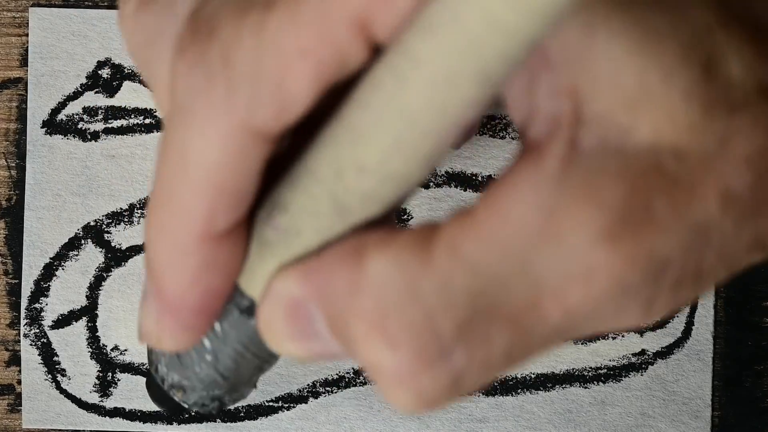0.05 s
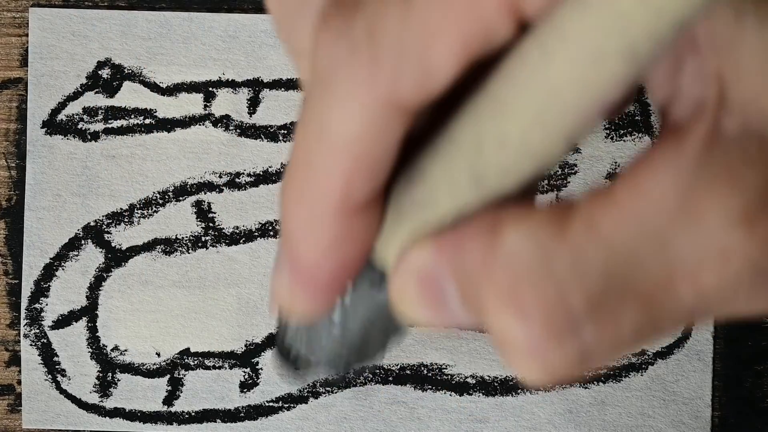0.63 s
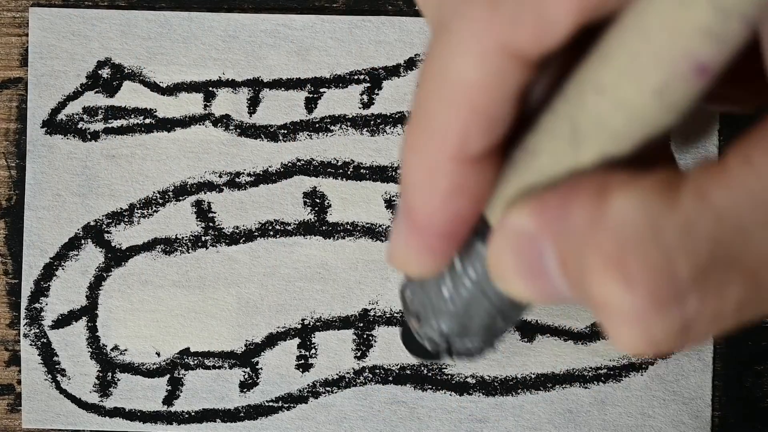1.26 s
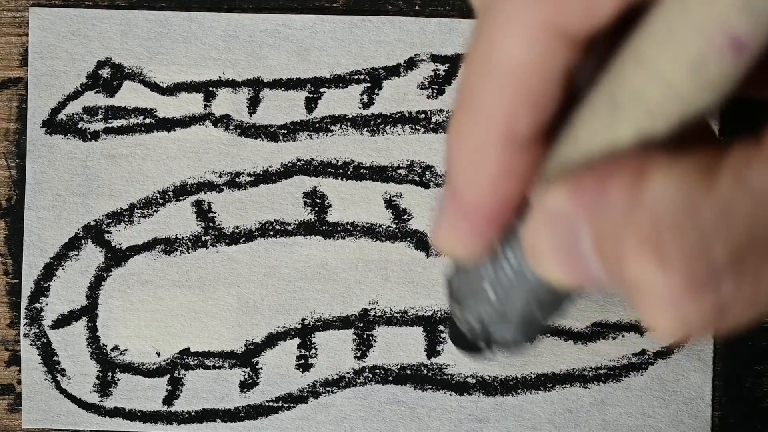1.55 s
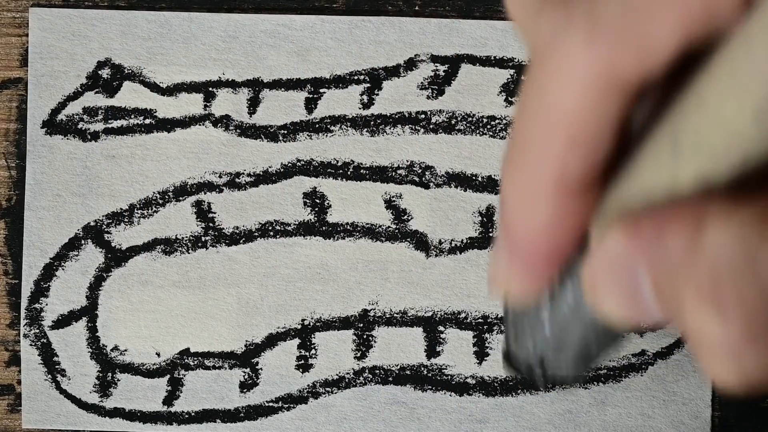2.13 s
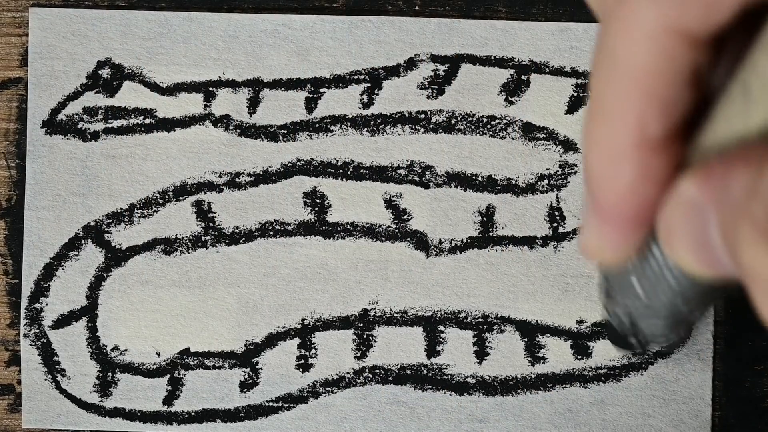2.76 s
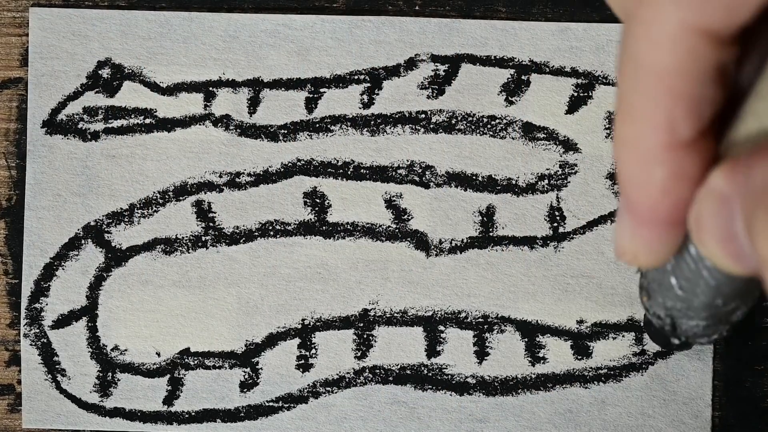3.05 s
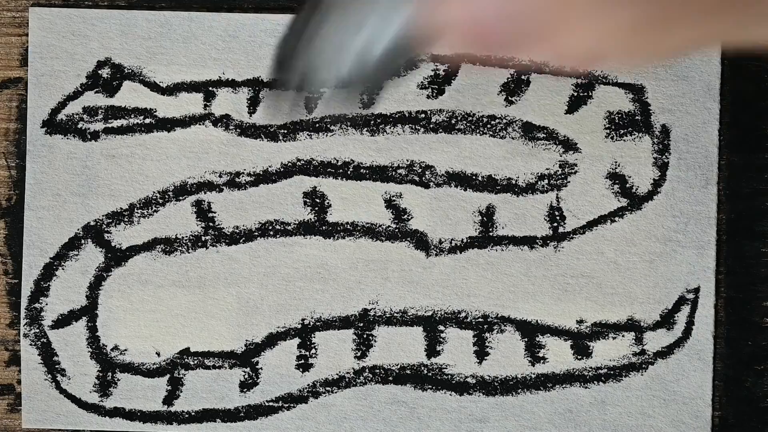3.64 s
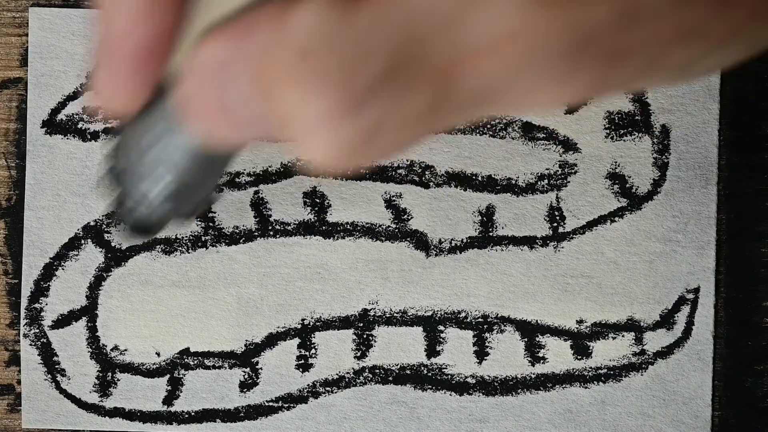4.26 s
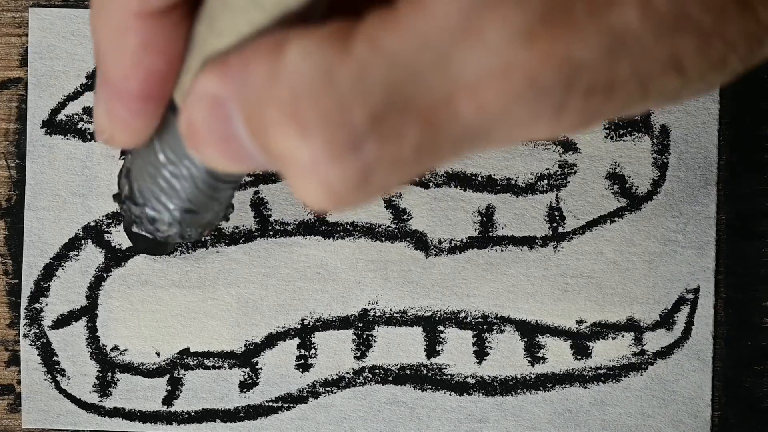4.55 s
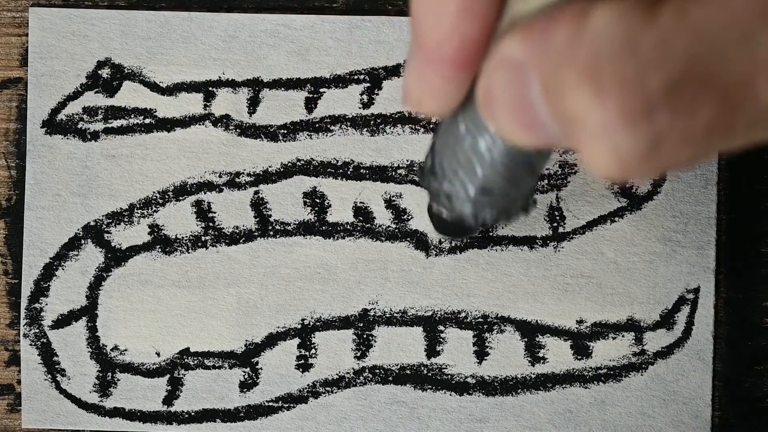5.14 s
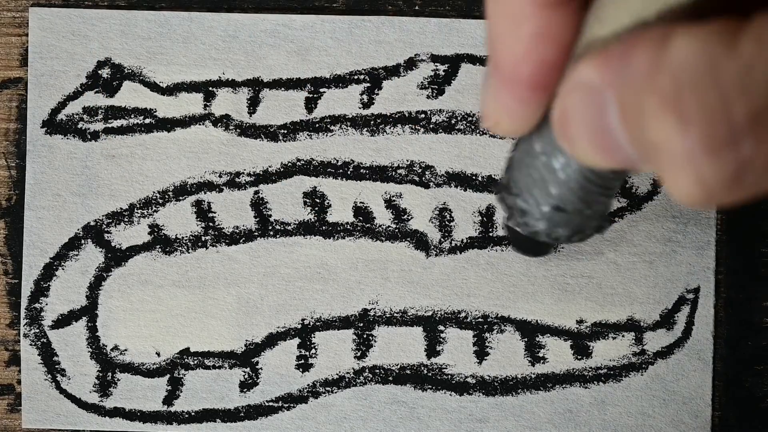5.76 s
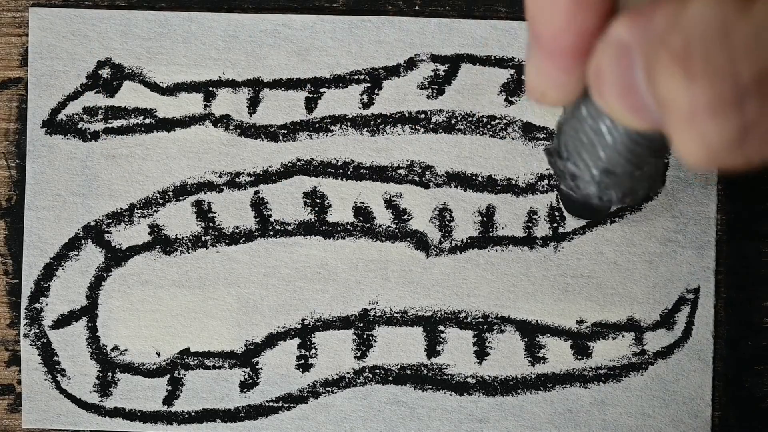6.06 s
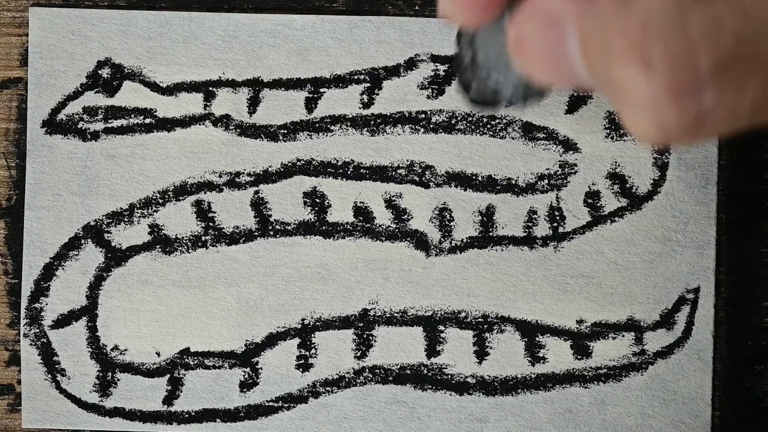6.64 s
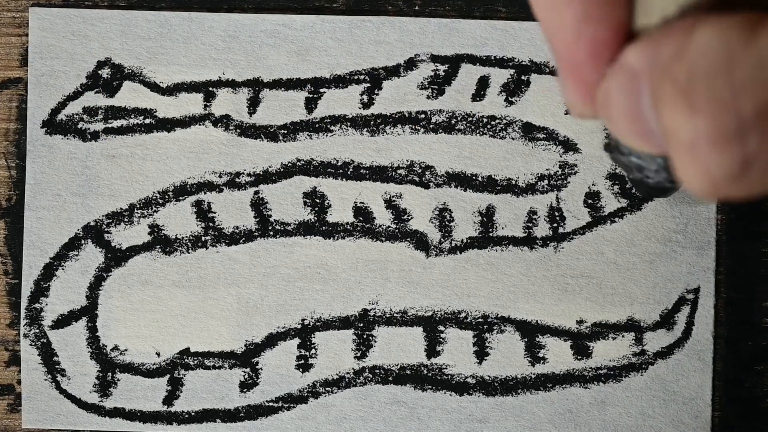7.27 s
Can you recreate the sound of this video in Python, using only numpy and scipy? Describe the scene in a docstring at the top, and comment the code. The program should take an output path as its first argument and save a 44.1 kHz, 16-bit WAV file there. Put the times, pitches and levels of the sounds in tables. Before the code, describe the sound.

A crayon scribbles short marks on paper on a wooden table, close to the microphone. The tip lands with a dull thud, scrubs quickly to and fro with a dry hiss and rasp, then lifts as the sheet and its backing drop back with a clack. This repeats two or three times a second, pauses briefly midway, then continues more slowly. Light brushing falls between some marks, over a steady hiss in a quiet room.

```python
"""A taped black crayon scribbles short marks on paper on a wooden table, close to the microphones.
First the tip lands with a thud. It then scrubs to and fro: wax slipping on the paper's tooth hisses,
the backing under the sheet rasps and the table rumbles. Last it lets go, and sheet and backing drop
back with a clack. Light brushing falls between some marks.
A quiet room and a steady hiss lie under it throughout."""
import sys
import numpy as np
from scipy import signal
from scipy.fft import rfft, irfft, next_fast_len
from scipy.io import wavfile
from scipy.ndimage import uniform_filter1d

SR = 44100
rng = np.random.default_rng(int(sys.argv[2]) if len(sys.argv) > 2 else 0)


def to_wav(sig):
    """Store sig (one row per channel, or 1-D mono) as 16-bit WAV at the path in sys.argv[1].

    Samples outside -1..1 are clipped; the rate is SR.
    """
    pcm = np.clip(np.atleast_2d(sig), -1, 1) * 32767
    pcm = np.round(pcm).astype(np.int16)
    wavfile.write(sys.argv[1], SR, pcm.T)  # frames by channels


N = 321930
TIME_S = np.arange(N) / SR
AGE_S = np.arange(SR // 4) / SR  # since a blow

# scribbled marks: (first pass [s], time per pass [s], passes [count], scratch [dB], change per pass [dB],
#                   sheen [dB re scratch], rasp [dB re scratch], table rumble [dB])
MARKS = [(.029, 0.058, 2, -41, 2.5, -4, -1.5, -22.5), (.341, 0.046, 4, -43.5, 0, -2, 1.5, -27.5),
         (.689, 0.043, 4, -37.5, -1.4, -2, -0.5, -28.5), (1.064, 0.044, 4, -41, 1, 1, 3.5, -28),
         (1.447, .044, 3, -39.5, 0, -0.5, 4.5, -30.5), (1.780, 0.046, 3, -41.5, 3, -4, 0, -30.5),
         (2.056, .045, 1, -46, 0, -8, 0.5, -45), (2.130, 0.043, 4, -41.5, 1.1, -7, 0.5, -33.5),
         (2.484, 0.041, 3, -40.5, 1.5, -8, -2, -31), (2.806, .041, 3, -46.5, 2.5, -10, -1, -33),
         (3.152, 0.062, 3, -52, 4, -13, -2, -36.5), (4.055, .042, 5, -41.5, 1.4, -9, -10, -33.5),
         (4.559, .057, 3, -38, -3, -15, -10, -35), (5.013, 0.044, 3, -40, -2.7, -12, -8, -32),
         (5.379, 0.039, 3, -40, -.8, -15.5, -7, -31.5), (5.772, 0.036, 3, -38.5, -4.5, -20, -6.5, -34),
         (6.079, 0.043, 3, -40, 0.5, -15, -13, -29.5), (6.677, 0.045, 3, -38.5, -2, -12.5, -4, -29.5),
         (7.103, 0.041, 2, -41.5, -3, -12, -0.5, -34)]


def tip_passes(return_db=-2, spread_db=1.87, jolt_re_rumble_db=-2.5):
    """The tip goes to and fro at an even pace, lighter on the way back."""
    rows = []  # (time [s], scratch [dB], sheen [dB re scratch], rasp [dB re scratch], jolt [dB])
    for start_s, pace_s, count, scratch_db, change_db, sheen_db, rasp_db, rumble_db in MARKS:
        for k in range(count):
            push_db = return_db * (k % 2) + spread_db * rng.standard_normal()
            pass_db = scratch_db + k * change_db + push_db
            jolt_db = rumble_db + jolt_re_rumble_db + push_db
            rows.append((start_s + k * pace_s, pass_db, sheen_db, rasp_db, jolt_db))
    return np.array(rows)


# wax hiss, its top octave, rub into the backing: (frequency [Hz], relative density [dB])
SCRATCH_SPECTRUM = [(1200, -12), (2500, -6.5), (4300, -1.5), (5300, 2.5), (5900, 4.5), (6700, 0.5),
                    (7800, -3), (9000, -12), (12500, -24), (16000, -14)]
SHEEN_SPECTRUM = [(7000, -12), (9300, -5.5), (10200, 1.5), (11300, -2), (12600, -6), (16000, -15.5)]
RASP_SPECTRUM = [(300, -11), (700, -6), (1200, 5), (1550, -0.5), (1900, 6.5), (2400, 5), (4500, 0),
                 (7000, 2)]
# contact noise: (frequency [Hz], left-right correlation [ratio])
CONTACT_CORRELATION = [(300, 0.97), (1600, 0.73), (3000, 0.21), (6000, 0.35), (12000, 0.25)]


def scribbling(passes, half_pass_s=0.012):
    """Each pass hisses on the paper's tooth, and the same rubbing makes the backing rasp."""
    times_s, scratch_db, sheen_db, rasp_db, _ = passes.T
    half_s = np.full(len(passes), half_pass_s)
    rasp = swells(times_s, half_s, scratch_db + rasp_db) * backing_rasp(RASP_SPECTRUM)
    scratch = swells(times_s, half_s, scratch_db) * friction(SCRATCH_SPECTRUM)
    sheen = swells(times_s, half_s, scratch_db + sheen_db) * friction(SHEEN_SPECTRUM)
    return scratch + sheen + rasp


def friction(spectrum, slips_per_s=9000, spread_db=2.1):
    """Wax catches on the paper's tooth in dense, tiny slips of uneven size."""
    caught = rng.random((2, N)) < slips_per_s / SR
    slips = caught * rng.standard_normal((2, N)) * amp(spread_db * rng.standard_normal((2, N)))
    return coloured(slips, spectrum, CONTACT_CORRELATION)


# backing modes: (frequency [Hz], base width [Hz], relative level [dB])
BACKING_MODES = [(282.5, 16.8, -2.5), (405, 30, -10), (506, 33, -13), (637, 33.5, -6.5), (752, 38, -5),
                 (870, 48, -6.5), (1031, 69, -2.5), (1044.4, 78, -7.5), (1176, 61, -10.5),
                 (1372, 29, -11.5), (1475, 58, -10), (1553, 50, 0.5), (1643, 80, -7.5), (1770, 92, -8),
                 (1863, 137, -8.5), (1940, 54, -20), (2274, 54, -13.5), (2427, 110, -17.5), (2620, 29, -15),
                 (2924, 93, -15), (3254, 61, -16), (4420, 210, -23), (4900, 140, -18), (5900, 220, -19.5),
                 (6470, 130, -29), (7000, 140, -28)]


def backing_rasp(spectrum):
    """Steady rubbing heard through the backing's modes, at rms 1."""
    return resonate(friction(spectrum), BACKING_MODES)


# wooden table modes: (frequency [Hz], base width [Hz], relative level [dB])
TABLE_MODES = [(48.7, 9, -11), (76.2, 10.3, -2), (136.4, 14.7, 1), (191.6, 17.5, -2.5), (219.6, 39.3, -10),
               (291, 26.5, -15.5), (385, 26, -21)]


def jolts(passes, lead_s=0.0091):
    """At each turn the wax breaks loose and bumps the table, just ahead of the hiss."""
    track = np.zeros((2, N))
    for time_s, *_, jolt_db in passes:
        bump = ring(TABLE_MODES, apart_db=0, damping=0.96, soft_hz=600, span_s=0.023)
        add(track, time_s - lead_s, amp(jolt_db) * bump)
    return track


def rumble(slips_per_s=85, spread_db=2.5, noise_db=-9.5):
    """The dragging tip sticks and slips at an uneven rate, shaking the table's low modes."""
    times_s = np.cumsum(rng.gamma(2, 1 / 2, size=1500)) / slips_per_s
    times_s = times_s[times_s < TIME_S[-1]]
    slips = np.zeros(N)
    slips[(times_s * SR).astype(int)] = amp(spread_db * rng.standard_normal(len(times_s)))
    drive = unit(slips) + amp(noise_db) * rng.standard_normal(N)
    shake = resonate(drive, TABLE_MODES)
    local_power = np.abs(uniform_filter1d(shake ** 2, size=1800))
    shake /= np.sqrt(local_power + 0.05)  # a steady hand evens the shaking
    return shake * hand_pressure()


def hand_pressure(lead_s=0.011, hold_s=0.035, drag_rel_db=-4, settle_rel_db=-14.5, resting_db=-52.5):
    """Rumble gain: the hand drags through each mark, settles after landings and shifts in between."""
    drag, settling = np.zeros((2, N))
    for start_s, pace_s, count, *_, rumble_db in MARKS:
        end_s = start_s + (count - 1) * pace_s + hold_s
        press = held(start_s - lead_s, end_s, attack_s=0.0099, release_s=0.052)
        drag += amp(rumble_db + drag_rel_db) * press
    for time_s, thud_db, *_ in LANDINGS:
        settling += amp(thud_db + settle_rel_db) * held(time_s, time_s, attack_s=0.0027, release_s=0.064)
    return np.sqrt(drag ** 2 + settling ** 2 + amp(resting_db) ** 2)


# backing hits table: (time [s], ring [dB], crack [dB re ring], thump [dB], ring tilt [dB/octave])
CLACKS = [(0.1609, -27, -0.5, -39, 0.5), (0.4998, -28, -6.5, -33, -1), (0.5055, -35, 2, -56, -1),
          (.8163, -47.5, 14.5, -46, -2), (0.8588, -28.5, -4, -36, 3), (0.865, -20, -9, -34, 0.5),
          (1.2188, -48, 11, -50, 0), (1.2372, -27.5, -8, -40, -1.5), (1.2548, -16, -9, -30.5, 1.5),
          (1.6029, -17, -8.5, -29.5, -1.5), (1.6125, -14.5, -7.5, -34, 2.5),
          (1.9272, -13.5, -7.5, -30, 1.5), (2.567, -46.5, 14, -49, -5), (2.6104, -20, -9, -29.5, -0.5),
          (2.9344, -20.5, -10, -35, -1.5), (3.2067, -46, 13.5, -46, -8), (3.2691, -43, 2, -32, 4),
          (3.2994, -19.5, -6.5, -25.5, 0), (4.286, -40.5, 7.5, -37.5, -3), (4.306, -23.5, -7.5, -32, 1.5),
          (4.7401, -24, -7, -33, -.5), (5.1528, -26.5, 0, -27, -3.5), (5.158, -30, 3, -39, 1),
          (5.5082, -32, 3, -34, -1), (5.52, -24.5, -2.5, -28.5, -2), (6.2067, -28, -9, -40, -1.5),
          (6.8397, -28.5, -6, -38, -4)]
# contact crack: (frequency [Hz], relative density [dB])
CRACK_SPECTRUM = [(300, -5.5), (1500, -3.5), (3000, -2.5), (4800, -2.5), (7000, -6), (9500, -9),
                  (16000, -12)]


def clacks():
    """The backing snaps down: a crack, its own short ring and a thump from the table."""
    track = np.zeros((2, N))
    for time_s, ring_db, crack_db, thump_db, tilt_db in CLACKS:
        # softer contact: less crack, fewer high modes; the struck spot sets the tilt
        softness_db = np.clip(-crack_db - 3.5, 0, 8)
        reach_hz = 9500 * amp(-1.6 * softness_db)
        modes = [(hz, width_hz, db + tilt_db * np.log2(hz / 1500)) for hz, width_hz, db in BACKING_MODES]
        backing = ring(modes, apart_db=3, damping=0.93, soft_hz=reach_hz, span_s=0.01)
        thump = ring(TABLE_MODES, apart_db=1.5, damping=1, soft_hz=900, span_s=0.023)
        snap = amp(crack_db) * crack(CRACK_SPECTRUM, t60_s=0.031)
        add(track, time_s, amp(ring_db) * (backing + snap) + amp(thump_db) * thump)
    return track * amp([[0.5], [-0.5]])  # slightly left


# tip or hand comes down: (time [s], thud [dB], tap [dB], tick [dB])
LANDINGS = [(0.026, -27.5, -46, -46), (.1154, -18.5, -26.5, -27), (.21, -34.5, -52, -56),
            (.635, -32.5, -32.5, -53), (.989, -28, -25.5, -49), (1.053, -24, -40, -41),
            (1.896, -27, -49, -40), (2.257, -24.5, -54, -41), (2.755, -32.5, -54, -56),
            (2.885, -29.5, -50, -47), (3.073, -25, -35.5, -56), (3.421, -23.5, -43, -53),
            (3.445, -31, -53, -57), (3.63, -39, -55, -58), (3.857, -45, -38, -53),
            (3.994, -23.5, -33.5, -40), (4.23, -28.5, -52, -55), (4.25, -28.5, -54, -55),
            (4.4782, -37, -40, -52), (4.4989, -21, -19.5, -29), (4.95, -33, -55, -55),
            (5.001, -27.5, -58, -48), (5.318, -32, -55, -53), (5.7, -36.5, -44, -53),
            (5.762, -27, -45, -40), (6.017, -32.5, -51, -55), (6.189, -29, -55, -54),
            (6.595, -26.5, -43, -53), (6.808, -31, -52, -50), (7.28, -36, -53, -52)]
# tip tick: (frequency [Hz], relative density [dB])
TICK_SPECTRUM = [(1000, -21), (3500, -3.5), (5000, 2.5), (6500, -6), (9000, -11.5), (16000, -17)]


def landings():
    """A soft touch on the sheet: the table thuds, the backing taps dully, the tip ticks."""
    track = np.zeros((2, N))
    for time_s, thud_db, tap_db, tick_db in LANDINGS:
        thud = ring(TABLE_MODES, apart_db=0.5, damping=1.03, soft_hz=620, span_s=0.022)
        tap = ring(BACKING_MODES, apart_db=2, damping=1.2, soft_hz=1290, span_s=0.0024)
        tick = crack(TICK_SPECTRUM, t60_s=0.026)
        add(track, time_s, amp(thud_db) * thud + amp(tap_db) * tap + amp(tick_db) * tick)
    return track


def ring(modes, apart_db, damping, soft_hz, span_s):
    """A blow rings the modes, sparing those above soft_hz; each microphone hears its own mix."""
    hz, width_hz, db = np.transpose(modes)
    spot_db = 2.5 * rng.standard_normal(len(hz))
    level_db = db + spot_db + apart_db * rng.standard_normal((2, len(hz)))
    gains = amp(level_db) * width_hz * (-1) ** np.arange(len(hz)) / (1 + (hz / soft_hz) ** 4)
    lag_rad = 0.87 * rng.standard_normal((len(hz), 1))  # the blow takes time to cross the wood
    tones = np.sin(2 * np.pi * np.outer(hz, AGE_S) + lag_rad)
    decay = np.exp(-np.pi * damping * np.outer(width_hz, AGE_S))
    attack = 1 - np.exp(-AGE_S * soft_hz)
    return unit(gains @ (tones * decay) * attack, span_s)


def crack(spectrum, t60_s, attack_s=0.00035):
    """The bright snap of a contact: a fast-dying noise burst."""
    burst = coloured(rng.standard_normal((2, len(AGE_S))), spectrum, CONTACT_CORRELATION)
    envelope = amp(-60 * AGE_S / t60_s) * (1 - np.exp(-AGE_S / attack_s))
    return unit(burst * envelope, span_s=0.0068)


# light brushes: (centre [s], half length [s], swish [dB], rasp [dB])
BRUSHES = [(0.18, 0.035, -44, -50), (0.523, 0.028, -43.5, -52), (0.885, 0.021, -42, -41),
           (2.639, 0.012, -42, -35), (3.79, 0.021, -41, -47), (3.873, 0.022, -47, -42.5),
           (4.328, 0.041, -42, -43), (4.483, 0.009, -53, -36.5), (4.762, 0.03, -38.5, -41),
           (4.812, 0.027, -39, -44), (5.188, 0.026, -42.5, -39), (5.532, 0.03, -40, -42)]
# flat rub on the backing, swish on the sheet: (frequency [Hz], relative density [dB])
BRUSH_RUB_SPECTRUM = [(300, -11), (1100, -2), (1550, -2), (2100, -5), (7000, -6)]
SWISH_SPECTRUM = [(500, 2), (1600, 1), (3000, 4), (7000, 1), (15000, -3.5)]


def brushing():
    """Light brushing over the sheet: a broad, dry swish with the backing's rasp in it."""
    times_s, half_s, swish_db, rasp_db = np.transpose(BRUSHES)
    rasp = swells(times_s, half_s, rasp_db) * backing_rasp(BRUSH_RUB_SPECTRUM)
    swish = swells(times_s, half_s, swish_db) * friction(SWISH_SPECTRUM)
    return swish + rasp


# room decay: (frequency [Hz], T60 [s])
ROOM_DECAY = [(100, 0.16), (1000, 0.16), (4000, 0.14), (14000, 0.097)]


def room_reverb(direct, level_db=-17.5, build_s=0.0073):
    """A small room answers, its treble dying first."""
    hz, age_s, bins = signal.stft(rng.standard_normal((2, SR // 3)), SR, nperseg=256)
    decay = amp(-60 * age_s / along(ROOM_DECAY, hz)[:, None])
    _, tail = signal.istft(bins * decay, SR, nperseg=256)
    tail *= 1 - np.exp(-np.arange(tail.shape[1]) / SR / build_s)
    tail /= np.linalg.norm(tail[0])
    return amp(level_db) * signal.fftconvolve(direct.mean(axis=0)[None], tail, axes=1)[:, :N]


# noise floor: (frequency [Hz], relative density [dB])
FLOOR_SPECTRUM = [(12, -34), (20, 2), (77, 3), (198, -0.5), (357, -2.5), (434, -4.5), (499, -4),
                  (660, -4.5), (849, -7), (1570, -9.5), (1960, -11.5), (2820, -12), (5230, -16),
                  (7310, -18), (16000, -24)]
# noise floor: (frequency [Hz], left-right correlation [ratio])
FLOOR_CORRELATION = [(60, 0.36), (150, 0), (400, 0), (15000, 0)]


def noise_floor(level_db=-38):
    """Steady room tone and microphone hiss."""
    return amp(level_db) * coloured(rng.standard_normal((2, N)), FLOOR_SPECTRUM, FLOOR_CORRELATION)


def swells(centres_s, halves_s, levels_db):
    """Gain of strokes that gather speed, run evenly and stop."""
    gain = np.zeros(N)
    for centre_s, half_s, db in zip(centres_s, halves_s, levels_db):
        near = slice(*np.searchsorted(TIME_S, [centre_s - 4 * half_s, centre_s + 4 * half_s]))
        gain[near] += amp(db) * np.exp(-np.abs((TIME_S[near] - centre_s) / half_s) ** 3 / 2)
    return gain


def held(start_s, end_s, attack_s, release_s):
    """Gain that reaches 1 at start_s, holds until end_s and dies away."""
    gain = np.zeros(N)
    near = slice(*np.searchsorted(TIME_S, [start_s - 10 * attack_s, end_s + 10 * release_s]))
    early_s = np.maximum(start_s - TIME_S[near], 0)
    late_s = np.maximum(TIME_S[near] - end_s, 0)
    gain[near] = np.exp(-early_s / attack_s - late_s / release_s)
    return gain


def resonate(drive, modes):
    """Drive through modes, at rms 1; neighbours swing in opposite directions."""
    def response(hz):
        return sum((-1) ** k * amp(db) * 1j * hz * width_hz / (mode_hz ** 2 - hz ** 2 + 1j * hz * width_hz)
                   for k, (mode_hz, width_hz, db) in enumerate(modes))
    return unit(filtered(drive, response))


def coloured(pair, spectrum, correlation):
    """Two unrelated signals to stereo of given spectrum and correlation, at rms 1."""
    def response(hz):
        angle = np.arccos(along(correlation, hz)) / 2
        return amp(along(spectrum, hz)) * np.array([np.cos(angle), np.sin(angle)])
    mid, side = filtered(pair, response)
    return unit(np.array([mid + side, mid - side]))


def filtered(x, response):
    """Apply a complex frequency response."""
    size = x.shape[-1]
    padded = next_fast_len(size + 8192)
    return irfft(rfft(x, padded) * response(np.fft.rfftfreq(padded, 1 / SR)), padded)[..., :size]


def along(points, hz):
    """Interpolate over log frequency."""
    knots_hz, values = np.transpose(points)
    return np.interp(np.log(hz + 1), np.log(knots_hz + 1), values)


def unit(x, span_s=None):
    """Scale to rms 1, over the first span_s if given."""
    head = x if span_s is None else x[..., :round(span_s * SR)]
    return x / np.sqrt(np.mean(head ** 2) + 1e-20)


def amp(db):
    """Decibels to gain."""
    return 10 ** (np.asarray(db) / 20)


def add(track, time_s, sound):
    """Mix a sound in at time_s."""
    part = track[..., max(round(time_s * SR), 0):][..., :sound.shape[-1]]
    part += sound[..., :part.shape[-1]]


def scene():
    """Crayon, table and room."""
    passes = tip_passes()
    direct = scribbling(passes) + jolts(passes) + brushing() + clacks() + landings()
    return direct + room_reverb(direct) + rumble() + noise_floor()


def record(dry):
    """Brick-wall low-pass at 15.9 kHz."""
    return filtered(dry, lambda hz: hz < 15900)


dry = scene()
out = record(dry)
to_wav(out)
```